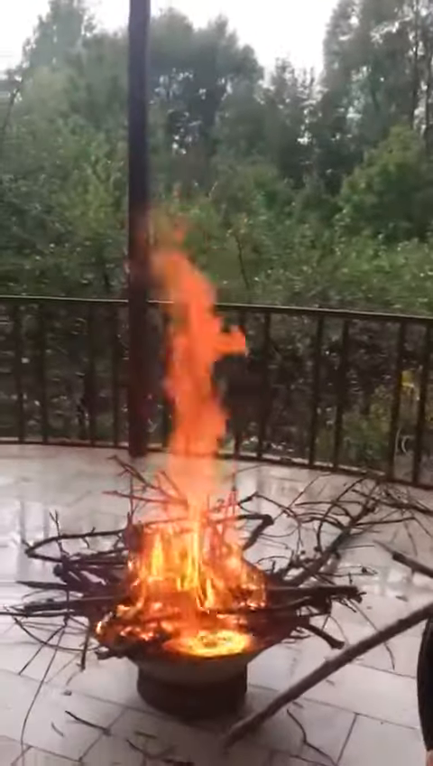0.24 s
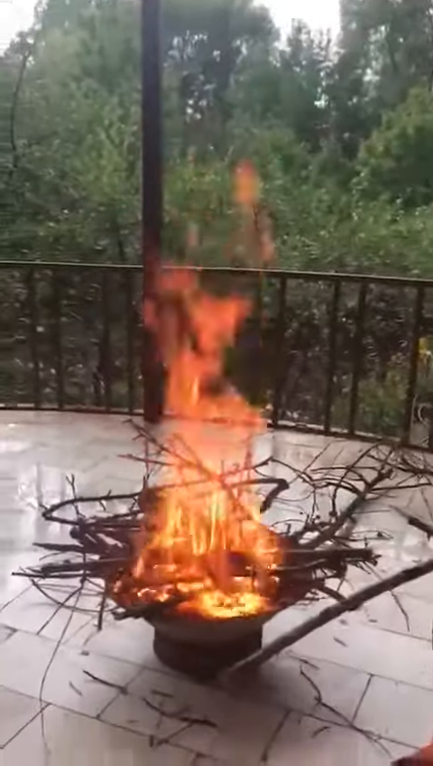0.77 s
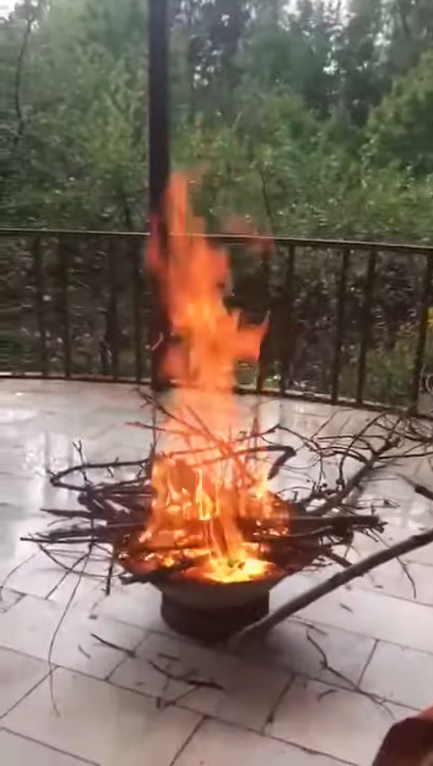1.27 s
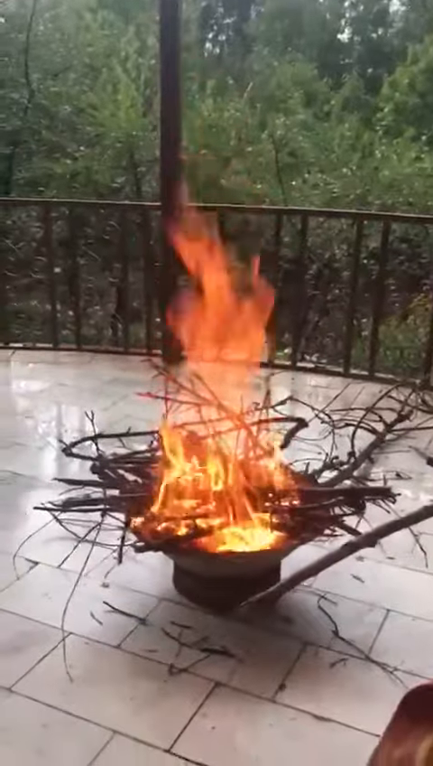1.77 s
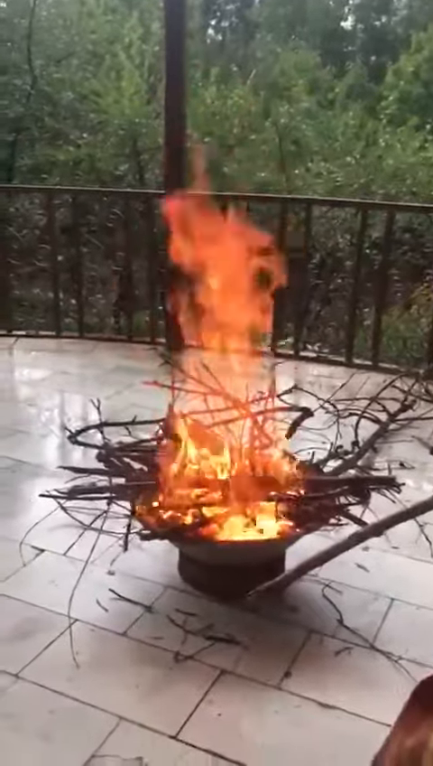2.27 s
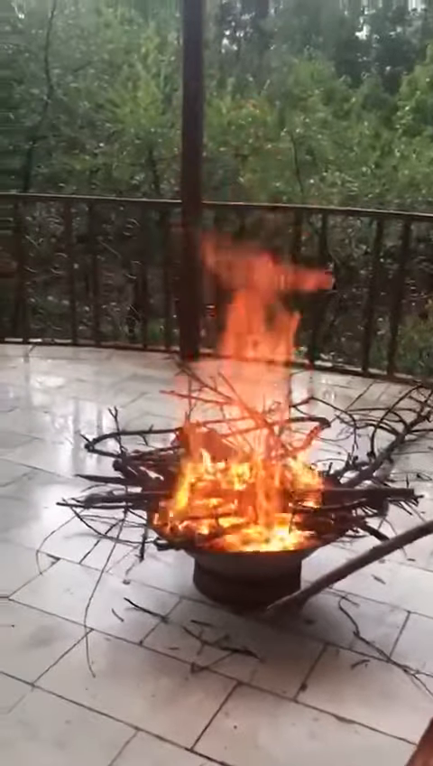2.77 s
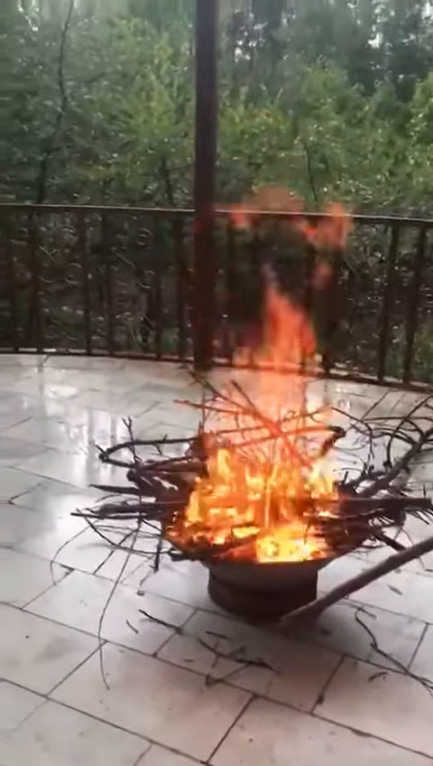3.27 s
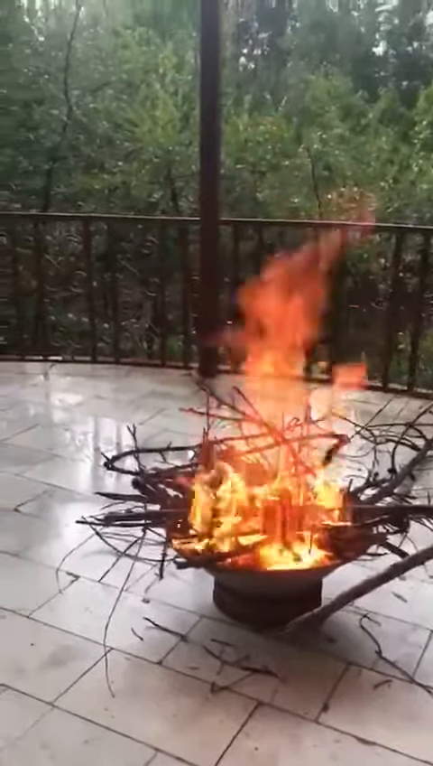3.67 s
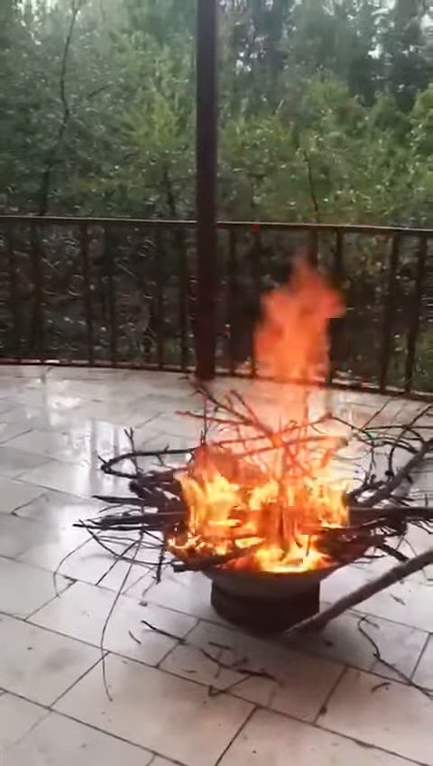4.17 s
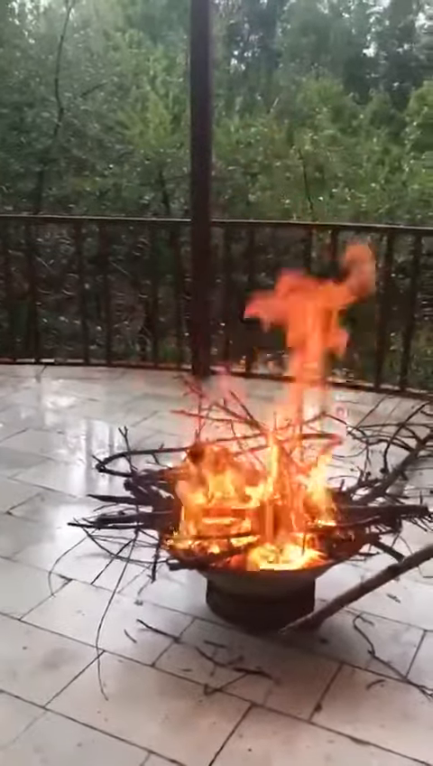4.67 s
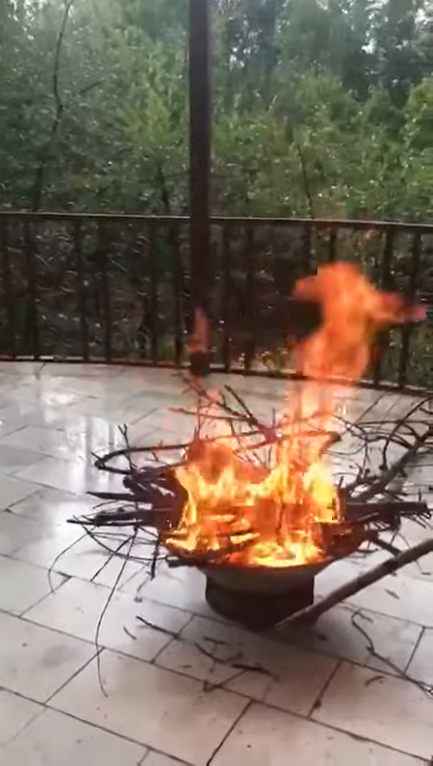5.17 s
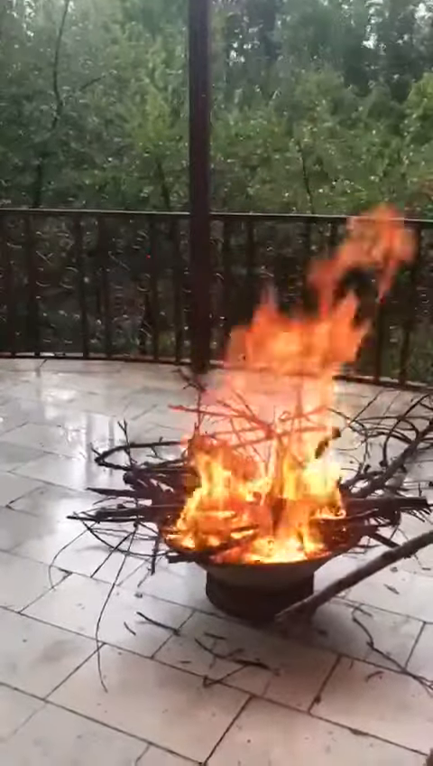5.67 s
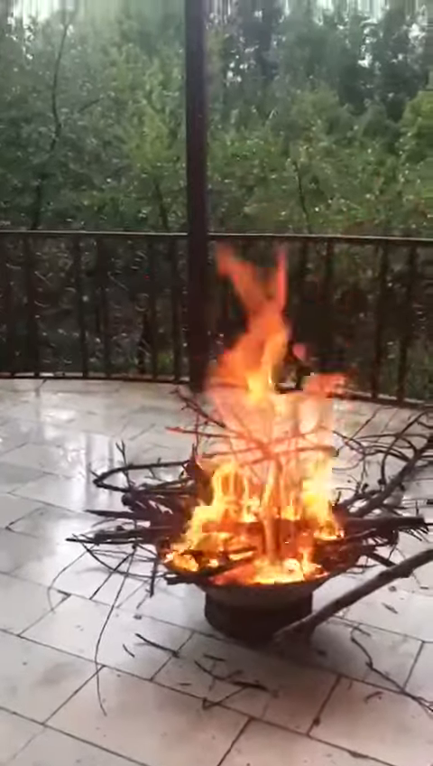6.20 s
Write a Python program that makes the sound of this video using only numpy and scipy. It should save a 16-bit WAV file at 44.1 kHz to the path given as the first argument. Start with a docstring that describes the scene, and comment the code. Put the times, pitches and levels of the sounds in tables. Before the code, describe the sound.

A twig fire burns in a bowl on a tiled veranda in steady rain. Small dry snaps come irregularly, then one very loud crack at about 3.4 seconds and a dense cluster of strong pops just after four. It calms, with small ticks near five and a last firm pop past six. Rain wash, low flame flutter and faint hiss continue throughout. One fairly close microphone, mono, short bright reverberation.

```python
"""A twig fire burns in a bowl on a tiled veranda while steady rain falls on the trees beyond.
Pops are jagged bursts coloured by resonant wood, followed by echoes and a diffuse ring of the veranda.
Random ticks make the crackle; shaped noise makes the low roar of the flames and the hiss of boiling sap.
Rain is a broad wash of noise with a patter of nearer drops.
One microphone is heard, the same in both ears."""
import sys
import numpy as np
from scipy import signal
from scipy.fft import rfft, irfft
from scipy.io import wavfile
from scipy.ndimage import uniform_filter1d

SR = 44100
rng = np.random.default_rng(int(sys.argv[2]) if len(sys.argv) > 2 else 0)


def inscribe(sig):
    """Save sig as 16-bit PCM at rate SR to the path in sys.argv[1].

    A 1-D sig is mono; a 2-D sig holds one channel per row.
    Samples are clipped to [-1, 1] before scaling.
    """
    pcm = np.round(np.clip(np.atleast_2d(sig).T, -1, 1) * 32767)
    wavfile.write(sys.argv[1], SR, pcm.astype(np.int16))


N = 283985  # length [samples]
EDGE_HZ = 11800  # upper band limit

# Pops of splitting wood; one that faces away is heard mostly through the veranda:
# (time [s], direct level [dB], veranda level [dB], pitch of the split [Hz], its width [octaves],
#  woody knock level [dB], low thud level [dB])
POPS = [ (0.5222, -27, -34, 6200, 0.32, -25.5, -45), (0.6013, -24, -18, 8000, .37, -41, -40),
        (0.607, -20, -21, 8050, .36, -42, -45), (0.828, -41, -19.5, 5000, .64, -51, -45),
        (0.986, -27, -26, 8500, .68, -40, -45), (1.1253, -28, -12.5, 6100, 0.33, -47, -47),
        (1.138, -30, -18, 5900, .55, -49, -45), (1.5691, -21, -27, 9500, .7, -27, -47),
        (1.7973, -11.5, -19.5, 4500, 1.0, -21, -19), (2.013, -23, -28, 5500, 0.32, -32, -45),
        (2.4123, -11.5, -22, 3760, 1, -25, -43), (2.6068, -21, -23, 3970, .3, -42, -43),
        (2.8055, -23, -31, 7100, .2, -49, -45), (3.286, -27, -23, 5950, .41, -45, -49),
        (3.427, 4.5, -4, 8160, 0.47, -40, -31), (3.528, -29, -25, 7440, .95, -40, -21),
        (3.6954, -16, -24, 8100, 0.3, -34, -42), (4.0092, -5, -8.5, 5060, 0.74, -14.5, -15),
        (4.0703, -8, -15, 9900, .6, -28, -39), (4.133, -28, -24, 8000, 0.28, -45, -47),
        (4.2181, -12.5, -22, 5240, .6, -18, -32), (4.293, -7.5, -22, 3670, 0.56, -22.5, -23),
        (4.3106, -22, -14.5, 7450, 0.42, -45, -45), (4.394, -11.5, -20.5, 6100, 0.68, -24, -32),
        (5.095, -32, -24, 2210, 0.35, -42, -47), (5.1176, -16, -24, 8700, 0.16, -32, -47),
        (5.228, -24.5, -27, 9000, .96, -30, -45), (5.2714, -28, -22.5, 8450, .54, -43, -45),
        (5.3094, -22, -38, 8300, 0.18, -45, -45), (6.2093, -10, -16.5, 7300, 0.83, -30, -21),
        (6.3268, -24.5, -22.5, 7950, 1, -48, -45), ]
# First echoes off the tiles, post and roof: (delay [s], level [dB])
ECHOES = [(.0031, -24), (.0056, -23), (.0094, -18), (.0118, -25)]
# Reverberation time of the veranda: (frequency [Hz], time to fall by 60 dB [s])
VERANDA_DECAY = [(150, 0.18), (1000, 0.41), (4000, 0.49), (8000, 0.3), (12000, 0.22)]
# Spurts of steam from the wood: (start [s], length [s], level [dB])
SPURTS = [(0.03, .08, -56), (0.306, .1, -57), (0.928, 0.22, -63), (2.633, 0.18, -54.5), (2.916, 0.064, -59),
          (3.245, 0.079, -57.5), (4.793, 0.23, -56.5), (5.103, .12, -58)]
SIMMER_DB, SPURT_RISE_S, SPURT_FALL_S = -62, 0.027, 0.018
# Relative spectrum of the steam: (frequency [Hz], density [dB per Hz])
STEAM_SPECTRUM = [(1000, -25), (2500, -7), (4200, 9.5), (6500, 6.5), (9000, 4.5), (12000, -12)]
# Moments when the flames flare up: (start [s], length [s], level [dB])
FLARES = [(0.434, 0.23, -56), (1.38, .2, -55), (1.76, 0.063, -49), (3.76, .12, -58), (4.27, .1, -53),
          (6.22, 0.26, -56)]
BURN_DB, FLARE_RISE_S, FLARE_FALL_S = -53, 0.037, 0.035
# Relative spectrum of the flames' roar: (frequency [Hz], density [dB per Hz])
ROAR_SPECTRUM = [(15, -11), (28, -5), (40, -15), (56, 2.5), (78, -3.5), (115, -1), (140, -4), (170, -9),
                 (200, -6), (226, -4.5), (260, -9), (330, -19), (600, -39.5)]
# Relative spectrum of far rain on leaves and tiles: (frequency [Hz], density [dB per Hz])
RAIN_SPECTRUM = [(200, -11), (330, 0.5), (470, -5), (620, 0), (1050, 1.5), (1400, 0.2), (2000, -4),
                 (3200, -6), (4500, -13), (6300, -12), (8000, -20), (10000, -20.5), (12000, -27)]
RAIN_DB = -51.5


def pops(knock_hz=1250, knock_wet_db=-5):
    """Room impulse principle: each pop arrives directly, then as echoes, then as a diffuse ring."""
    out = np.zeros(N)
    # the thick wood behind the split answers lower
    branch = ring(knock_hz, octaves=1.0, skirt_db=-30)
    for s, direct_db, veranda_db, hz, octaves, knock_db, thud_db in POPS:
        burst = crack()
        splinter = ring(hz, octaves, skirt_db=-12)
        direct = gain_of(direct_db) * unit(np.convolve(burst, splinter))
        direct += gain_of(knock_db) * unit(np.convolve(burst, branch))
        add(out, s, direct)
        for delay, db in ECHOES:
            add(out, s + delay, gain_of(db) * direct)
        # the veranda gathers what the split sends in all directions: a broader colour
        spread = gain_of(veranda_db) * ring(hz, octaves, skirt_db=-10)
        spread += gain_of(knock_db + knock_wet_db) * branch
        add(out, s, signal.fftconvolve(veranda(), spread))
        add(out, s, gain_of(thud_db) * thud())
    return out


def crack(tear_s=0.00027, tear_db=9, rattle_s=0.0046, rattle_db=-1, size=1024):
    """Impulsive release: a steam pocket bursts in a snap, fibres tear, then twigs scatter the sound."""
    t = np.arange(size) / SR
    tear, rattle = rng.standard_normal((2, size))
    tear = unit(tear * t * np.exp(-t / tear_s))
    rattle = unit(rattle * np.exp(-t / rattle_s))
    snap = t == 0
    z = rfft(snap + gain_of(tear_db) * tear + gain_of(rattle_db) * rattle, 2 * size)
    # the burst is jagged in detail but white overall: the wood gives the colour
    smooth_power = uniform_filter1d(abs(z) ** 2, size=80)
    return irfft(z / np.sqrt(smooth_power))[:size]


def thud(low_hz=105, high_hz=480, decay_s=0.016, size=5000):
    """Damped forced vibration: the push of gas briefly shakes the pile and bowl."""
    t = np.arange(size) / SR
    shake = rng.standard_normal(size) * np.exp(-t / decay_s)
    band = signal.butter(2, [low_hz, high_hz], "band", fs=SR, output="sos")
    return unit(signal.sosfilt(band, shake))


def ring(hz, octaves, skirt_db, size=512):
    """Minimum-phase resonance: wood answers causally with one broad peak standing on a flat skirt."""
    f = np.fft.rfftfreq(size, 1 / SR) + 1
    gain = np.exp(-.5 * (np.log2(f / hz) / octaves) ** 2) + gain_of(skirt_db)
    # roll off above the band limit and below 300 Hz
    gain = gain / np.sqrt((1 + (f / EDGE_HZ) ** 24) * (1 + (300 / f) ** 2))
    # folding the cepstrum onto positive times makes the response causal
    cepstrum = irfft(np.log(gain + 1e-4))
    cepstrum[1:size // 2] *= 2
    cepstrum[size // 2 + 1:] = 0
    return unit(irfft(np.exp(rfft(cepstrum))))


def veranda(build_s=0.0024, size=256):
    """Diffuse reverberation: a fresh noise tail builds quickly and each band dies at its own speed."""
    hz, t, z = signal.stft(rng.standard_normal(SR // 2), SR, nperseg=size)
    decay_db = -60 * t / read(VERANDA_DECAY, hz)[:, None]
    tail = signal.istft(z * gain_of(decay_db), SR, nperseg=size)[1]
    build = 1 - np.exp(-np.arange(len(tail)) / SR / build_s)
    return unit(tail * build)


def crackle():
    """Sparse random impulses: a few faint snaps a second from the burning twigs."""
    snaps = patter(per_s=3.5, spread_db=0.5, low_hz=5500, high_hz=9000, octaves=0.78, wet_db=1.0)
    return gain_of(-70.5) * snaps


def sizzle():
    """Jet noise: boiling sap simmers unevenly and hisses in spurts while thin twigs tick softly."""
    unevenness_db = 1.0 * wander(low_hz=1.555, high_hz=6.4)
    level = surges(SIMMER_DB, SPURTS, SPURT_RISE_S, SPURT_FALL_S) * gain_of(unevenness_db)
    hiss = wash(STEAM_SPECTRUM, patchy_db=2.2, flicker_db=1.0)
    ticks = patter(per_s=90, spread_db=4.2, low_hz=3000, high_hz=9000, octaves=.35, wet_db=3)
    return level * hiss + gain_of(-62.0) * ticks


def flames():
    """Combustion noise: turbulent burning gas gives a low fluttering roar that flares now and then."""
    level = surges(BURN_DB, FLARES, FLARE_RISE_S, FLARE_FALL_S)
    return level * wash(ROAR_SPECTRUM, patchy_db=0.5, flicker_db=-0.46, size=4096)


def rain():
    """Superposition: countless far drops merge into a wash; nearer ones patter on leaves and tiles."""
    far = wash(RAIN_SPECTRUM, patchy_db=1.0, flicker_db=-0.04)
    near = patter(per_s=500, spread_db=3.5, low_hz=756, high_hz=5030, octaves=0.53, wet_db=-4.5)
    return gain_of(RAIN_DB) * far + gain_of(-60.0) * near


def patter(per_s, spread_db, low_hz, high_hz, octaves, wet_db, count=12):
    """Shot noise: random ticks of many pitches, most of them small, with their ring in the veranda."""
    out = np.zeros(N)
    for hz in np.geomspace(low_hz, high_hz, count):
        size_db = spread_db * np.minimum(rng.exponential(1, N), 3.5)
        sizes = gain_of(size_db) * rng.choice([-1, 1], N)
        struck = rng.random(N) < per_s / count / SR
        out += signal.oaconvolve(sizes * struck, ring(hz, octaves, skirt_db=-31))[:N]
    wet = signal.oaconvolve(out, veranda())[:N]
    return evened(out + gain_of(wet_db) * wet)


def wash(colour, patchy_db, flicker_db, size=1024):
    """Filtered random noise: a fixed colour with drifting patches and a flicker shared by all pitches."""
    hz = np.fft.rfftfreq(size, 1 / SR)
    frames = 4 * N // size + 6
    a, b, patches = rng.standard_normal((3, frames, len(hz)))
    patches = uniform_filter1d(patches, size=12, axis=0)  # smooth in time
    patches = evened(uniform_filter1d(patches, size=16, axis=1))  # smooth in frequency
    flicker = evened(uniform_filter1d(rng.standard_normal(frames), size=8))[:, None]
    level_db = read(colour, hz) + patchy_db * patches + flicker_db * flicker
    z = (a + 1j * b) * gain_of(level_db)
    return evened(signal.istft(z.T, nperseg=size, noverlap=size - size // 4)[1][:N])


def surges(steady_db, events, rise_s, fall_s):
    """Addition of powers: surges on a steady level rise, hold to their length's end and die away."""
    t = np.arange(N) / SR
    power = gain_of(steady_db) ** 2 * np.ones(N)
    for start, length, db in events:
        rise = np.clip((t - start) / rise_s, 0, 1)
        fall = np.exp(-np.maximum(t - start - length, 0) / fall_s)
        power += (gain_of(db) * rise * fall) ** 2
    return np.sqrt(power)


def wander(low_hz, high_hz, count=16):
    """Sum of slow sines in random phase: an irregular drift of rms 1."""
    t = np.linspace(0, N / SR, count * count)
    drift = sum(np.sin(2 * np.pi * (f * t + rng.random())) for f in np.geomspace(low_hz, high_hz, count))
    return np.interp(np.arange(N) / SR, t, evened(drift))


def gain_of(db):
    """Logarithmic level: decibels to amplitude gain."""
    return 10 ** (np.asarray(db) / 20)


def evened(x):
    """Mean power: scales to rms 1."""
    return x / np.sqrt(np.mean(x ** 2) + 1e-20)


def unit(x):
    """Total energy: scales the sum of squares to 1."""
    return x / np.sqrt(np.sum(x ** 2) + 1e-20)


def read(points, hz):
    """Logarithmic pitch: interpolates a table on a log-frequency axis."""
    f, value = np.transpose(points)
    return np.interp(np.log(hz + 1), np.log(f + 1), value)


def add(mix, s, sound):
    """Linear superposition: lays a sound into the mix at time s [s]."""
    part = mix[max(round(s * SR), 0):][:len(sound)]
    part += sound[:len(part)]


def scene():
    """Superposition at one point: fire and rain sum at one microphone, copied to both ears."""
    mono = pops() + crackle() + sizzle() + flames() + rain()
    return np.tile(mono, (2, 1))


def record(dry):
    """Band limitation: a linear-phase low-pass filter removes the highest treble."""
    low_pass = signal.firwin(511, EDGE_HZ, window=("kaiser", 9), fs=SR)
    return signal.oaconvolve(dry, low_pass[None], "same")


dry = scene()
out = record(dry)
inscribe(out)
```